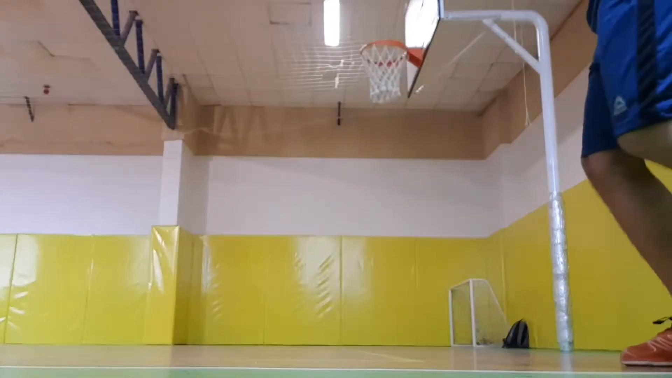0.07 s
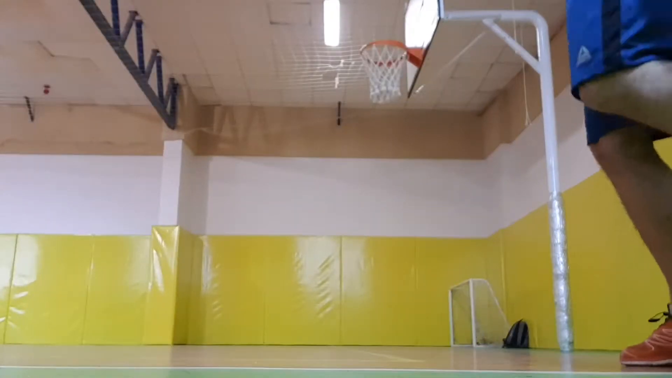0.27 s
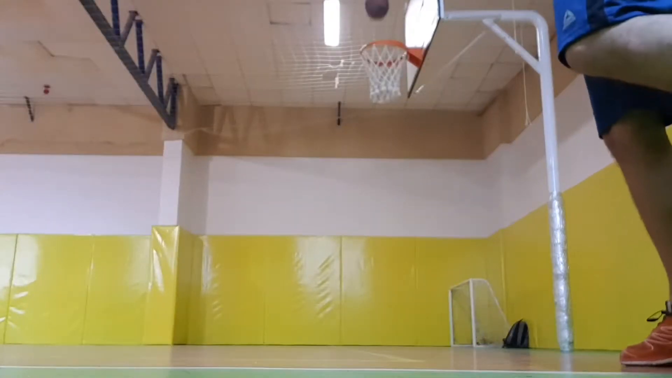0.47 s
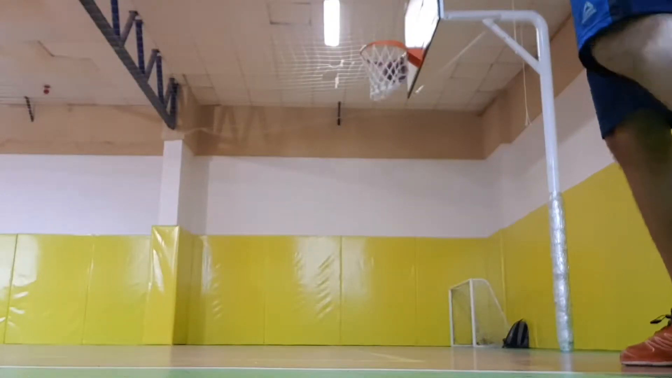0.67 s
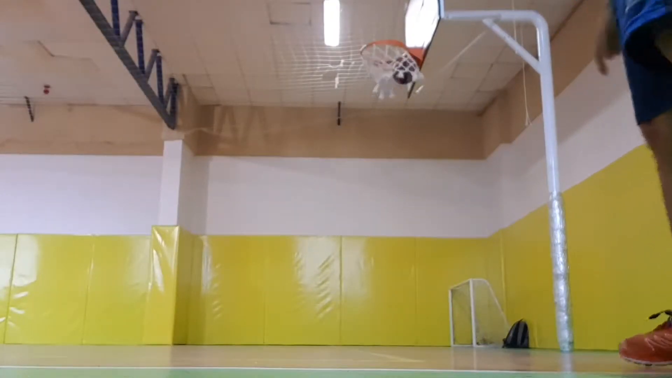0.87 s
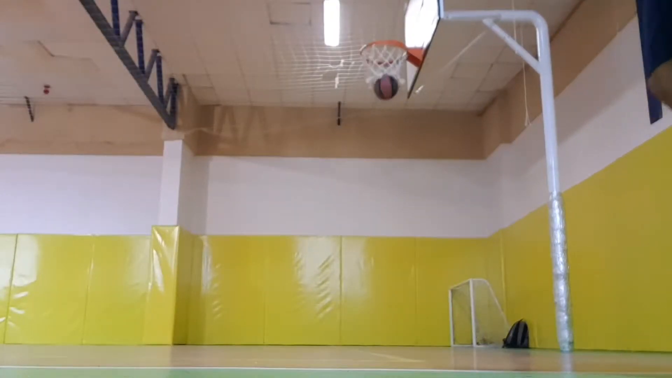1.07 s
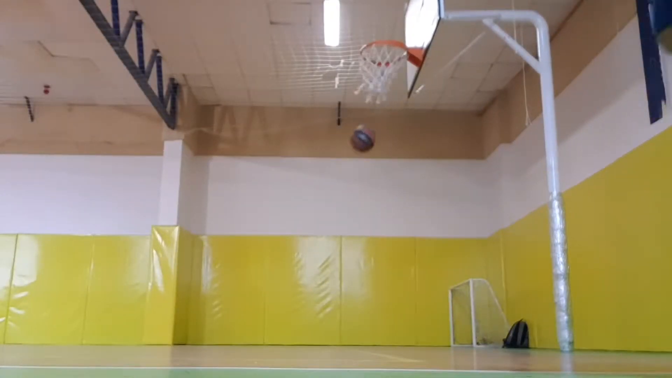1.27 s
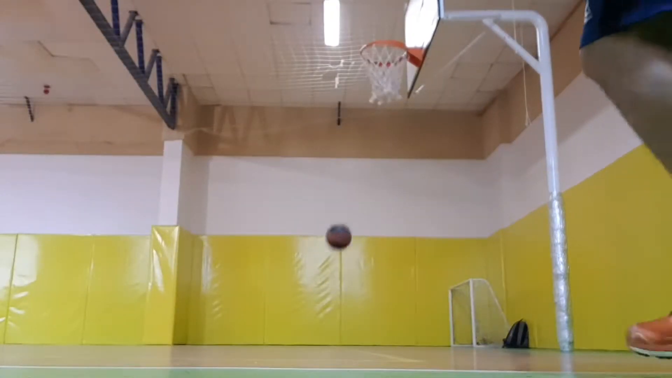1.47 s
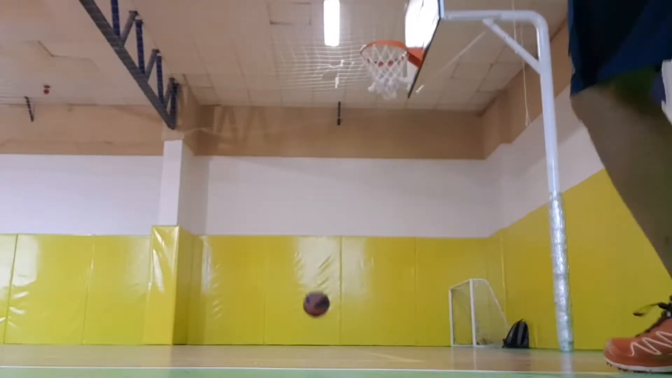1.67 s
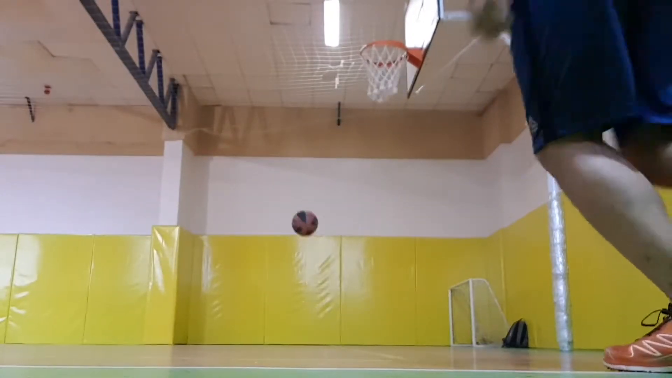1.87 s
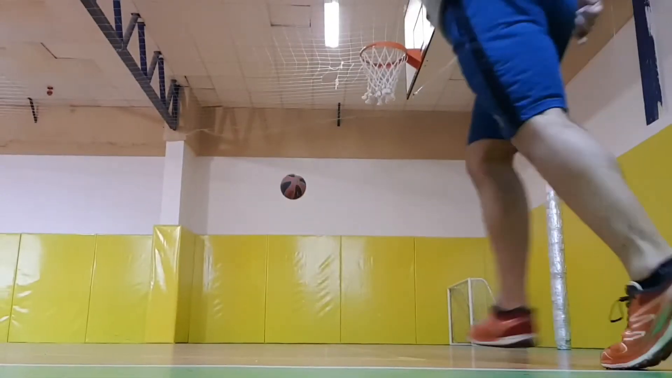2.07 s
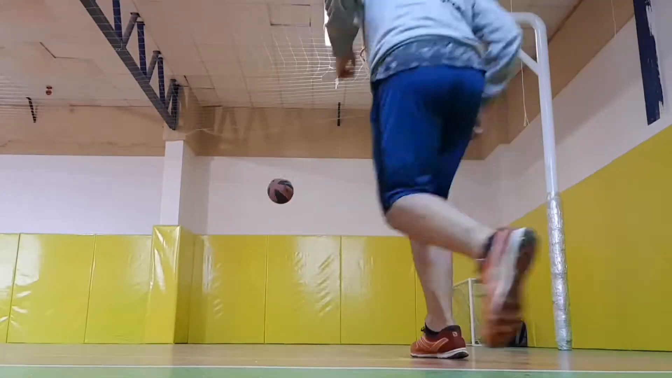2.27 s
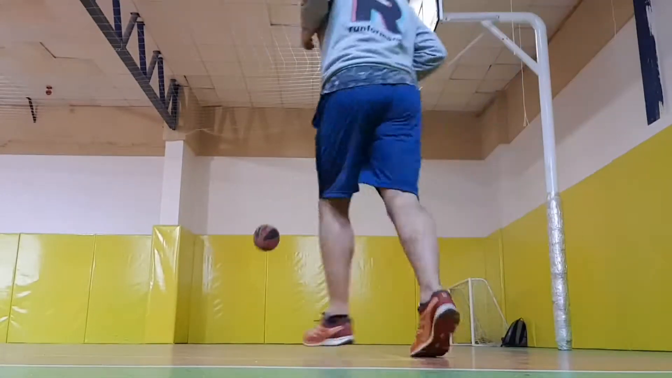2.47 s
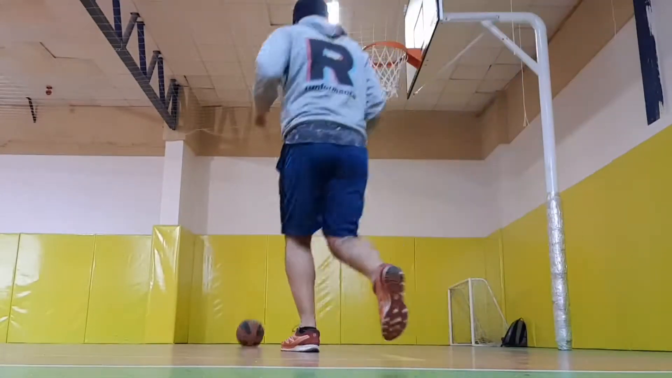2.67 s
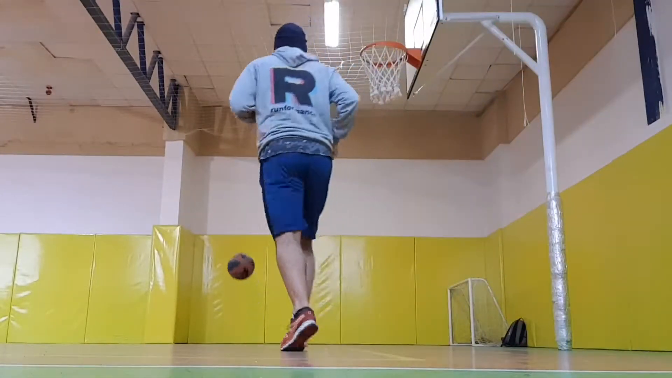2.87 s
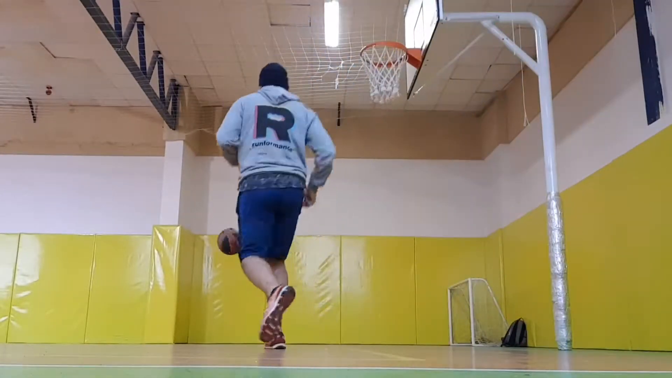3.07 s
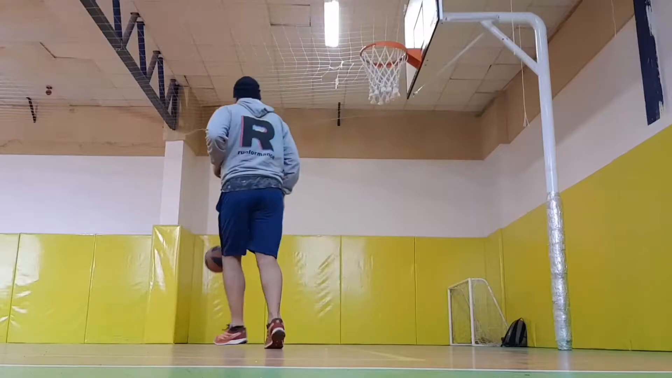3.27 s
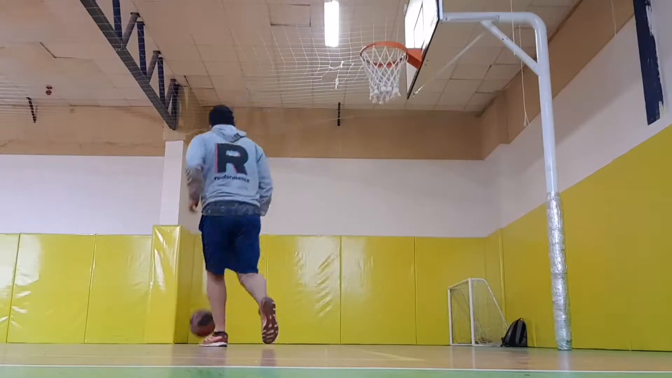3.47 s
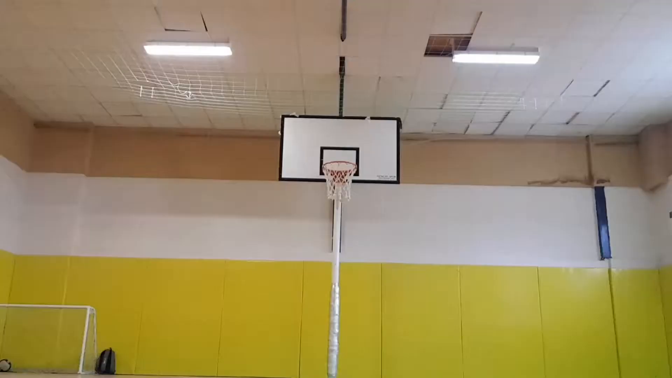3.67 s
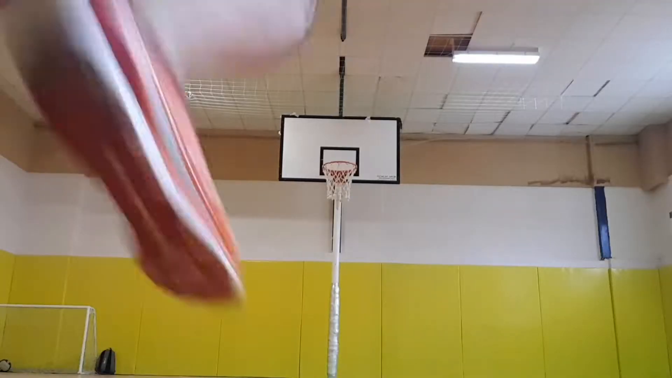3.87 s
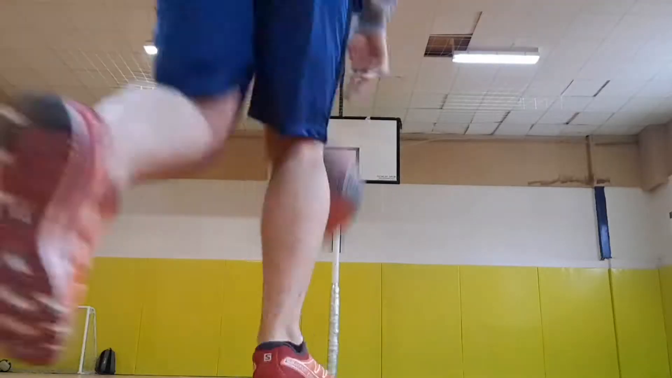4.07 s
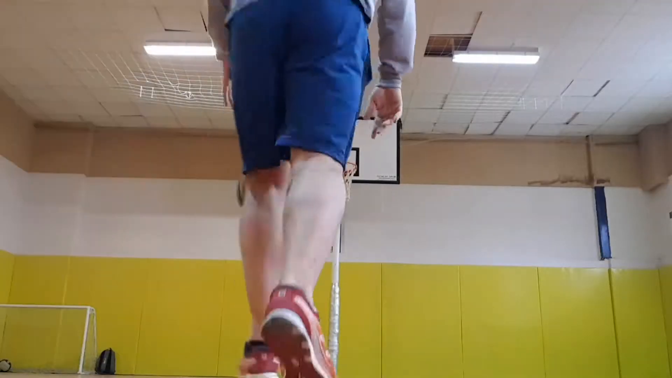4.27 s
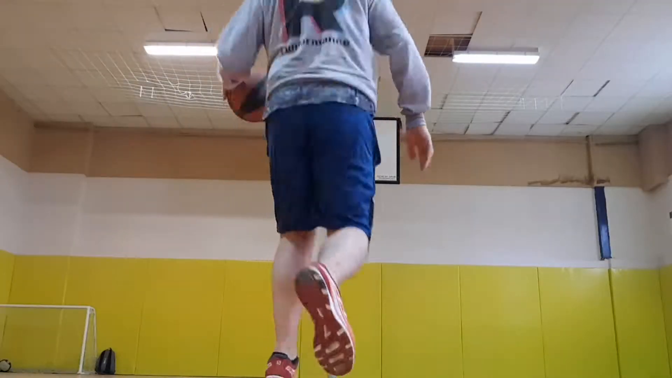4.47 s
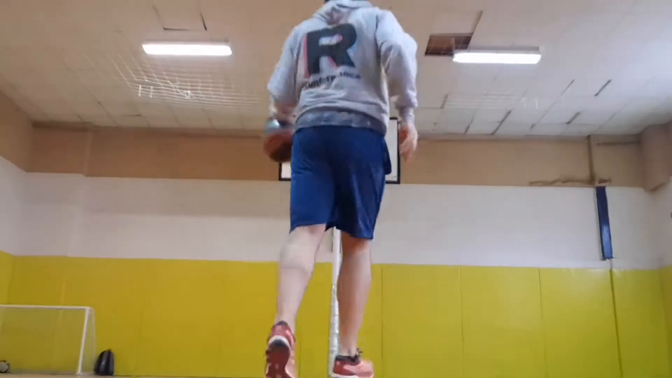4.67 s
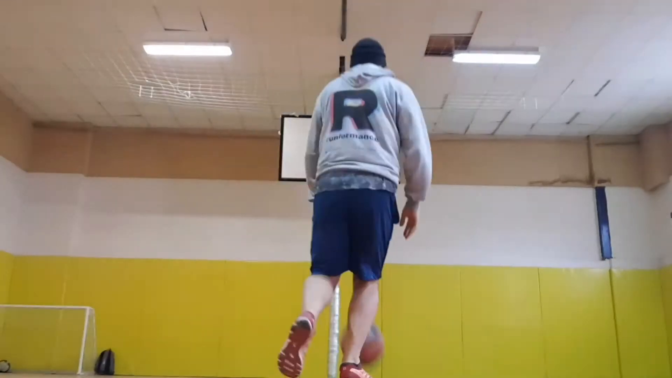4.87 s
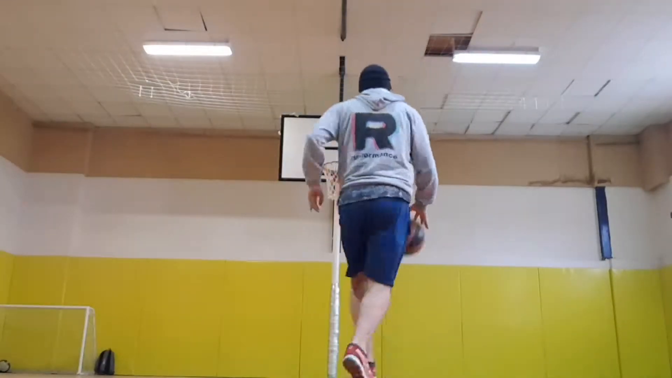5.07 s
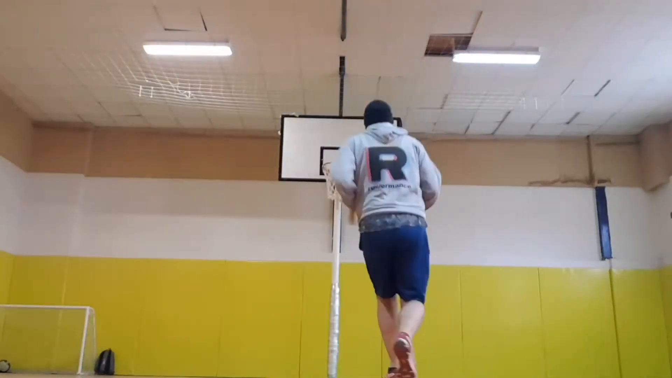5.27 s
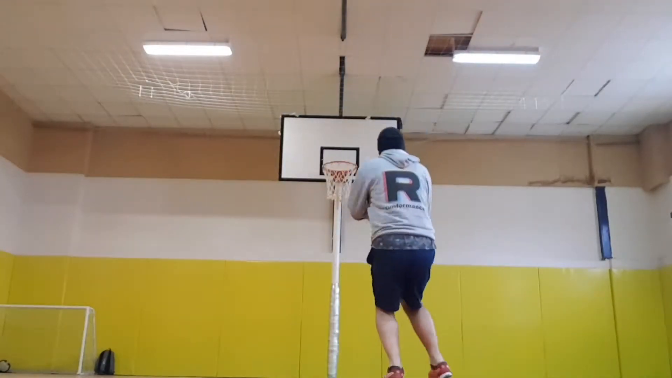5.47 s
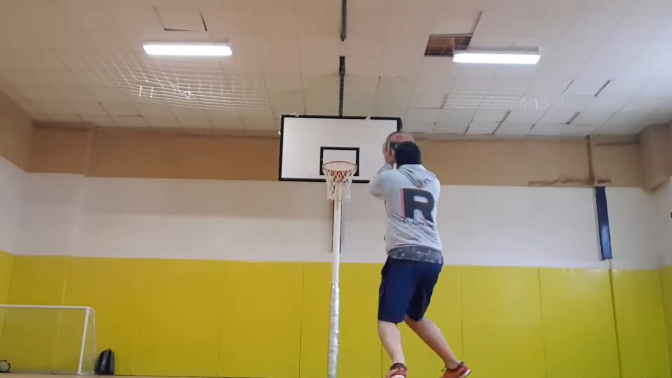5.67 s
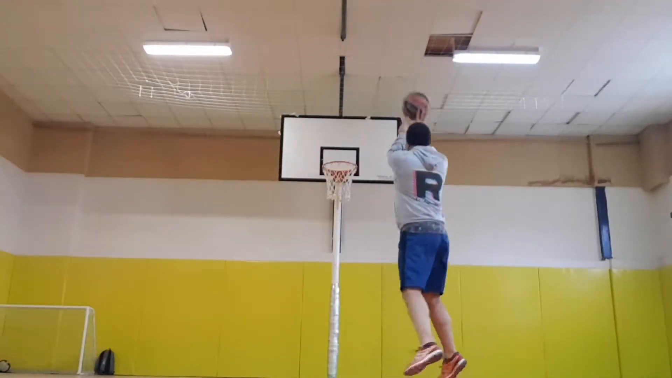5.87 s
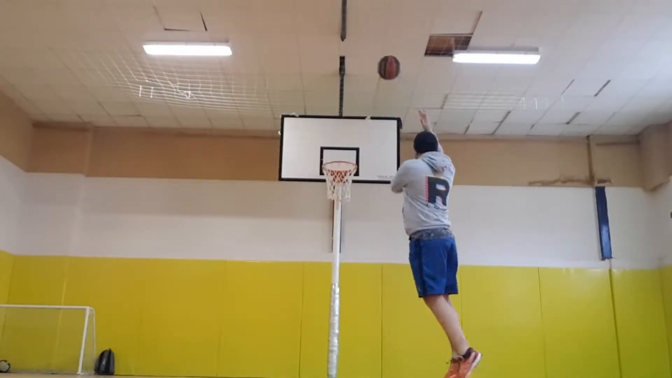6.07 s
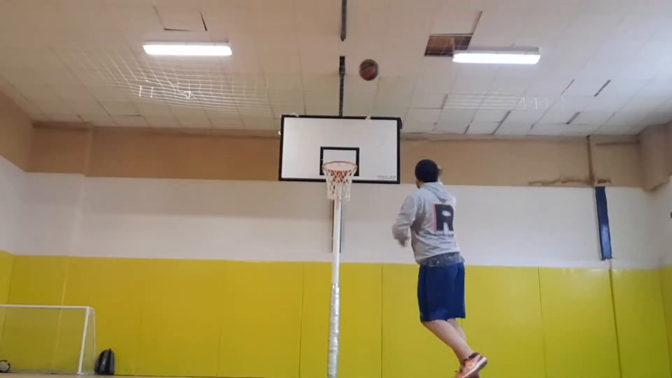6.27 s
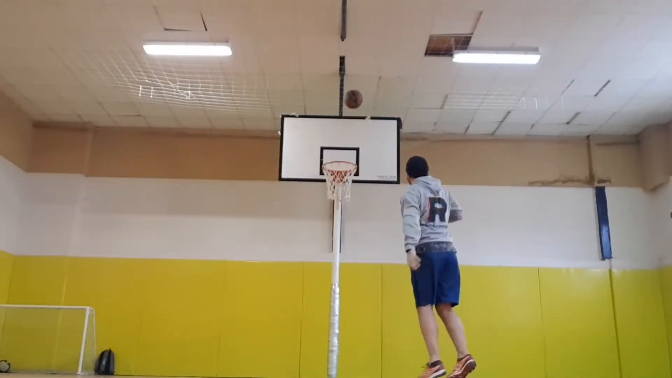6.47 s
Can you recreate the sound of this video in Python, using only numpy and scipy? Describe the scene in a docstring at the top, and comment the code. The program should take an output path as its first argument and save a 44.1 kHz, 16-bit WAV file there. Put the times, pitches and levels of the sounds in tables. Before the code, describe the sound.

A faint low hush fills a large echoing gym. At 0 s a shoe chirps on varnish and lands close by with a gritty double tap and floor thud. Around 0.63-0.8 s a ball rattles rim and board in a quick fluttering clatter with light steel jingle; the frame booms low and lingers. A step falls at 1.3 s with a cloth swish, then at 1.72 s the ball hits the floor with a loud, bright slap, hollow thump and rapid echoes. Running steps at 2.2, 2.7, 3.1 and 3.5 s recede; bounces come at 2.78 and, duller, 3.6 s. Close steps at 3.7 and 4.1 s lead into dribble smacks at 4.26 and 5.02 s, with a step at 4.9. Heavy planting steps and a short scuff come near 5.45 s, a lighter step at 5.7, a fingertip tick at 5.9, and soft landing taps from 6.2 to 6.5 s.

```python
"""A shoe chirps and lands on a wooden floor; then a ball rattles the rim and board in an echoing gym.
The ball bounces, and the player runs after it, dribbles and releases another shot.
Ball, floorboards and board frame are sums of decaying modes; shoes, cloth and rim are shaped noise.
A hall of noise bands, each with its own decay, surrounds them over a steady hush."""
import sys
import numpy as np
from scipy import signal
from scipy.fft import rfft, irfft, next_fast_len
from scipy.io import wavfile

SR = 44100
rng = np.random.default_rng(int(sys.argv[2]) if len(sys.argv) > 2 else 0)


def transcribe(u):
    """Save the signal u as a 16-bit wav file named by the first command-line argument.

    u: samples, shape (n,) or (channels, n), limited to [-1, 1]; the rate is SR.
    q: integer samples, one column per channel.
    """
    v = np.clip(np.atleast_2d(u).T, -1, 1)
    q = np.round(v * 32767).astype(np.int16)
    wavfile.write(sys.argv[1], SR, q)


N = 287532

# All levels are relative; later gains add to them.
# Spectrum of the steady hush. Each row: frequency in Hz, level in dB.
HUSH_SPECTRUM = [(25, -7.5), (45, -4.5), (70, -10), (108, 0.5), (175, -23.5), (285, -40.5), (516, -41.5),
                 (2400, -40), (6700, -41), (15000, -35.5)]
# Likeness of the two sides in diffuse sound. Each row: frequency in Hz, left-right correlation.
LIKENESS = [(60, 1), (130, 0.98), (250, 0.92), (500, 0.63), (1000, 0.077), (3000, 0.041), (12000, 0.16)]
# Decay of the hall's late tail. Each row: frequency in Hz, time to fall 60 dB in seconds.
HALL_DECAY = [(50, 1.17), (130, 0.82), (350, 1.055), (700, 0.7), (1400, 1.31), (2500, 1.494), (4200, 1.27),
              (7000, 0.9), (11000, 0.58), (16000, 0.81)]
# Colour of the hall's response. Each row: frequency in Hz, level in dB.
HALL_COLOUR = [(30, -4.5), (70, 0), (135, 0), (250, 0), (480, -0.5), (750, -5), (1300, -2), (2500, -5.5),
               (4500, -3.5), (8000, 0.5), (15000, 4)]
# The player's distance from the microphone. Each row: time in seconds, distance in m.
PLAYER_DISTANCE = [(0, 1.33), (2.199, 1.9), (2.7, 3.9), (3.551, 4.9), (3.75, 1.24), (4.1, 1), (4.9, 3.34),
                   (5.6, 2.37), (6.3, 4.9)]
# Clothes swishing. Each row: centre in seconds, level in dB, length in seconds.
SWISHES = [(0.006, -46.5, 0.049), (1.37, -52.5, 0.14), (3.937, -62, 0.15), (4.31, -49, 0.0095),
           (5.449, -56.5, 0.05)]
# Spectrum of rubbing cloth. Each row: frequency in Hz, level in dB.
CLOTH_SPECTRUM = [(100, -7.5), (500, 19.5), (1200, -8), (4000, 3), (7000, -8.5), (12000, -7.5),
                  (15500, -22)]
# Soles chirping on varnish. Each row: centre in seconds, level in dB, length in seconds.
SCUFFS = [(0, -49, 0.14), (0.206, -60, 0.011), (2.558, -55.5, 0.013)]
# Spectrum of the chirps. Each row: frequency in Hz, level in dB.
SQUEAK_SPECTRUM = [(240, -40), (1700, -22), (2400, -2.5), (3300, -17), (15000, -44.5)]
# Soles grinding as a stride is braked. Each row: centre in seconds, level in dB, length in seconds.
SLIDES = [(3.111, -46, 0.0095), (5.474, -50, 0.026), (6.282, -57.5, 0.033)]
# Spectrum of the grinding. Each row: frequency in Hz, level in dB.
GRIND_SPECTRUM = [(100, -20), (450, 2), (750, 2), (1200, -3.5), (2400, -4), (4000, -27), (15000, -44)]
# Fingers push the dribble and release the shot. Each row: start in seconds, level in dB.
TOUCHES = [(4.198, -44.5), (5.910, -39.5)]
# Spectrum of the fingertips. Each row: frequency in Hz, level in dB.
FINGER_SPECTRUM = [(250, -36), (1200, -9), (2600, -2), (5000, -24), (15000, -32)]
# A shoe lands heel first, then rolls onto the forefoot. Each row: start in seconds, heel level in dB,
# roll in seconds, forefoot level in dB, treble cut in Hz, floor thud level in dB.
STEPS = [(.009, -14, 0.055, -12, 3000, -3), (1.309, -10, 0.0097, -10, 2450, -9.5),
         (2.234, -19, 0.033, -13, 1650, -7.5), (2.676, -23, 0.024, -19, 2280, -8),
         (3.111, -18.5, 0.018, -22.5, 1800, -13), (3.482, -34.5, 0.041, -18.5, 1200, -1.5),
         (3.705, -10.5, 0.02, -13, 4080, -2), (4.101, -24.5, .022, -19, 3530, 0),
         (4.898, -14, 0.021, -22, 1700, -7), (5.429, -8.5, .023, -14, 1200, 0.5),
         (5.732, -24, 0.021, -31.5, 1500, -6), (6.208, -36, .021, -21.5, 1700, -2),
         (6.262, -24, 0.051, -26, 1920, -6), (6.500, -23, 0.0065, -27, 2400, -20)]
# Spectrum of a sole's tap. Each row: frequency in Hz, level in dB.
SOLE_SPECTRUM = [(60, -14), (200, 9.5), (450, 2), (750, 1.5), (1150, -0.5), (2200, -1), (5000, -15.5),
                 (15000, -25.5)]
# Modes of the floorboards under a shoe. Each row: frequency in Hz, level in dB, 60 dB decay in seconds.
STEP_BOARD_MODES = [(110, -12.5, 0.031), (200, -0.5, 0.028), (324.7, -6.5, 0.059), (414.4, -2, 0.052),
                    (543, -12.5, 0.062), (670, -3.5, 0.018)]
# Ball rattling between rim and board. Each row: start in seconds, clatter level in dB,
# frame level in dB, jingle level in dB.
HOOP_HITS = [(0.63, -35, -29, -29.5), (0.64, -19, -27.5, -25), (.654, -9.5, -12, 3),
             (.680, -4.5, -11, -4.5), (.702, 1, -0.5, -7.5), (0.732, -1, -2, -5.5), (.790, -10, -7, -6)]
# Modes of rim, board and pole. Each row: frequency in Hz, level in dB, 60 dB decay in seconds.
FRAME_MODES = [(39.3, -16.5, 3.9), (60.3, -12, 2.2), (112.4, -4.5, 1.31), (150, -10.5, 1.3),
               (175.4, -6.5, 1.9), (204.3, -4.5, 1.2), (248.4, -4.5, 1.51), (291.5, -5, 1.15),
               (365.3, -9.5, 1.4), (459, -14.5, 1.2), (947, -13, 0.45), (1083, -10, 0.4), (1260, 5, 0.095),
               (1444, -6.5, 0.6), (1660, -6, 0.25), (2310, -22.5, 1.1)]
# Spectrum of the rim's clatter. Each row: frequency in Hz, level in dB.
CLATTER_SPECTRUM = [(60, -19.5), (200, -3.5), (400, 0), (700, 3.5), (1000, 1.5), (1550, -3), (2200, -8.5),
                    (4000, -17), (7000, -31), (10000, -48.5), (15000, -43.5)]
# Spectrum of the rim's loose steel. Each row: frequency in Hz, level in dB.
JINGLE_SPECTRUM = [(500, -17), (2000, -6), (4000, -2.5), (7000, -8.5), (10000, -16.5), (15000, -23)]
# Ball on floor. Each row: start in seconds, slap level in dB, slap cut in Hz, smack level in dB,
# smack frequency in Hz, thump level in dB, thump frequency in Hz, floorboard level in dB,
# hall level in dB, echo level in dB, near wall lag in seconds, ceiling lag in seconds.
BOUNCES = [(1.7208, 1, 5540, -10.5, 1430, -4.5, 128.2, -8.5, 4, -3, .0085, .0340),
           (2.7812, -2, 6600, -17.5, 2100, -11, 122, -29, 3.5, -6, 0.01, 0.033),
           (3.6016, -8.5, 3090, -33, 1490, -16.5, 119, -18.5, 1, -0.5, .0107, .0349),
           (4.2590, -8.5, 3430, -22.5, 3160, -13.5, 127, -8.5, -2, -35, .0230, 0.05),
           (5.0174, -3.5, 3160, -35, 3000, -13.5, 120.6, -13, 6, -13.5, 0.025, 0.052)]
# Modes of skin slapping the boards. Each row: frequency in Hz, level in dB, 60 dB decay in seconds.
SLAP_MODES = [(265, -21.5, 0.046), (970, -23, 0.018), (1240, -17.5, 0.011), (1920, -5.5, 0.0021),
              (2698, -13, 0.0053), (3804, -6.5, 0.0021), (5600, -13.5, 0.00045), (11600, -17.5, .0007)]
# Modes of the air inside the ball. Each row: frequency in Hz, level in dB, 60 dB decay in seconds.
BALL_AIR_MODES = [(961, -35.5, 0.11), (1074, -32.5, 0.13), (1232, -45.5, 0.37), (1277, -45, 0.16),
                  (1358, -37, 0.16), (1488, -39.5, 0.25), (1693, -42.5, .25), (1790, -41.5, 0.25),
                  (2340, -46.5, 0.3), (2720, -40, 0.23), (3580, -34, 0.024)]


def from_db(db):
    """Decibels to amplitude: 20 dB is a factor of ten."""
    return 10 ** (np.asarray(db) / 20)


def seconds(length):
    """Sampling: a time axis of the given length in seconds."""
    return np.arange(int(length * SR)) / SR


def at_hz(points, hz):
    """Interpolation on a log-frequency axis, as pitch is heard."""
    f, value = np.transpose(points)
    return np.interp(np.log(np.maximum(hz, 1)), np.log(f), value)


def add(out, s, sound):
    """Superposition: mix a sound in at time s."""
    i = max(0, round(s * SR))
    room = max(0, out.shape[-1] - i)
    out[..., i:i + sound.shape[-1]] += sound[..., :room]


def soften(x, cut_hz, order=2):
    """Low-pass filtering: a softer contact loses its treble."""
    low_pass = signal.butter(order, min(cut_hz, .45 * SR), fs=SR, output="sos")
    return signal.sosfilt(low_pass, x)


def ring(modes, t, spread_db=0):
    """Modal synthesis: struck modes decay exponentially, their strengths varied at random."""
    chance_db = spread_db * rng.uniform(-1, 1, len(modes))
    total = 0
    for (hz, db, t60), own_db in zip(modes, chance_db):
        total = total + from_db(db + own_db - 60 * t / t60) * np.sin(2 * np.pi * hz * t)
    return total


def spread(mid, side, hz):
    """Interaural correlation: two unrelated signals become stereo, alike on both sides in the bass."""
    alike = np.clip(at_hz(LIKENESS, hz), -1, 1)
    return np.sqrt(1 + alike) * mid + np.sqrt(1 - alike) * side * [[1], [-1]]


def noise(spectrum, size):
    """Random-phase synthesis: diffuse stereo noise of rms 1 with a given spectrum."""
    hz = np.fft.rfftfreq(size, 1 / SR)
    mid, side = np.exp(2j * np.pi * rng.random((2, len(hz))))
    x = irfft(from_db(at_hz(spectrum, hz)) * spread(mid, side, hz), size)
    return x / x.std()


def flutter(t, depth_db, per_s):
    """Random amplitude modulation: a jumping gain with mean power 1."""
    knots = np.arange(0, t[-1] + 1, 1 / per_s)
    jumps = np.clip(rng.standard_normal(len(knots)), -2, 2)
    gain = from_db(depth_db * np.interp(t, knots, jumps))
    return gain / np.sqrt(np.mean(gain ** 2))


def hush(level_db=-64.5):
    """Stationary noise: the hall's steady background."""
    return from_db(level_db) * noise(HUSH_SPECTRUM, next_fast_len(N))[:, :N]


def hall(x, build_s=0.016, scatter_db=-5, scatter_t60=0.08, clump_db=1.0, grain_db=3):
    """Reverberation: quick scatter from near floor and walls, then a tail that dies band by band."""
    t = seconds(2)
    # reflections come in clumps
    arrivals = flutter(t, clump_db, per_s=130) * flutter(t, grain_db, per_s=1300)
    white = rfft(noise([(20, 0), (20000, 0)], len(t)) * arrivals)
    octave = np.log2(np.maximum(np.fft.rfftfreq(len(t), 1 / SR), 1))
    # the scatter's square root keeps its energy independent of its decay time; each band's tail carries energy
    # in proportion to its own
    scatter = from_db(scatter_db - 60 * t / scatter_t60) * np.sqrt(np.log(1e6) / scatter_t60 / SR)
    response = 0
    for centre in np.arange(4.5, 14.6, .5):   # overlapping half-octave steps
        band = irfft(white * np.maximum(0, 1 - 2 * np.abs(octave - centre)), len(t))
        tail = from_db(-60 * t / at_hz(HALL_DECAY, 2 ** centre)) * np.sqrt(np.log(1e6) / SR)
        colour = from_db(at_hz(HALL_COLOUR, 2 ** centre))
        response = response + band * colour * np.hypot(tail, scatter)
    response = response * np.minimum(t / build_s, 1)
    return signal.fftconvolve(x[None], response, axes=1)[:, :N]


def swell(s, length):
    """Gaussian envelope: a smooth stroke centred on s, with length as its standard deviation."""
    return np.exp(-.5 * np.minimum(((np.arange(N) / SR - s) / length) ** 2, 100))


def rub(spectrum, strokes):
    """Friction noise: rubber or fabric swells and fades with each stroke."""
    strength = sum(from_db(db) * swell(s, length) for s, db, length in strokes)
    return noise(spectrum, next_fast_len(N))[:, :N] * strength


def hands(t60=0.0086):
    """Impact noise: fingertips tick on the ball."""
    out, t = np.zeros((2, N)), seconds(.1)
    for s, db in TOUCHES:
        add(out, s, noise(FINGER_SPECTRUM, len(t)) * from_db(db - 60 * t / t60))
    return out


def steps(level_db=-21, tap_t60=0.048, grit_db=4.0):
    """Impact and resonance: heel and forefoot give gritty taps over a thud of the sprung floor."""
    out, t = np.zeros((2, N)), seconds(.2)
    for s, heel_db, roll_s, fore_db, cut_hz, thud_db in STEPS:
        for lag, db in ((0, heel_db), (roll_s, fore_db)):
            grit = flutter(t, grit_db, per_s=700)
            tap = noise(SOLE_SPECTRUM, len(t)) * grit * from_db(-60 * t / tap_t60)
            thud = from_db(thud_db) * ring(STEP_BOARD_MODES, t, spread_db=0.5)
            add(out, s + lag, from_db(level_db + db) * (soften(tap, cut_hz, order=1) + thud))
    return out


def player(rub_hall_db=-4, hand_hall_db=-8, hall_radius_m=2.26):
    """Direct-to-reverberant ratio: the hall's share of shoes, hands and clothes grows with distance."""
    metres = np.interp(np.arange(N) / SR, *np.transpose(PLAYER_DISTANCE))
    taps, ticks = steps(), hands()
    rubs = rub(SQUEAK_SPECTRUM, SCUFFS) + rub(GRIND_SPECTRUM, SLIDES) + rub(CLOTH_SPECTRUM, SWISHES)
    to_hall = taps + from_db(hand_hall_db) * ticks + from_db(rub_hall_db) * rubs
    return taps + ticks + rubs, to_hall[0] * metres / hall_radius_m


def frame(level_db=-24.5, blur_hz=22, blur_share=.03):
    """Energy storage in modes: board and pole boom on, each mode blurred by many paths in the hall."""
    t, start = seconds(2.2), HOOP_HITS[0][0]
    blows, out, boom = np.zeros(len(t)), np.zeros((2, N)), 0
    push = np.hanning(int(.012 * SR))   # the soft ball feeds its energy in gradually
    for s, _, db, _ in HOOP_HITS:
        add(blows, s - start, from_db(db) ** 2 * push / push.sum())
    for hz, db, t60 in FRAME_MODES:
        # energy leaks away at the mode's own rate
        energy = signal.lfilter([1], [1, -from_db(-120 / (t60 * SR))], blows)
        # random phases, joined by straight lines, wander faster for higher modes
        paths = np.exp(2j * np.pi * rng.random((2, 2048)))
        position = t * (blur_hz + blur_share * hz)
        mid, side = (np.interp(position, np.arange(len(p)), p) for p in paths)
        wave = np.real(spread(mid, side, hz) * np.exp(2j * np.pi * hz * t))
        boom = boom + from_db(level_db + db) * np.sqrt(energy) * wave
    add(out, start, boom)
    return out


def rim(clatter_db=-18, clatter_t60=0.26, rise_s=0.0045, rattle_db=4,
        jingle_db=-38, jingle_t60=0.21, jingle_grain_db=6, direct_db=-2, hall_db=-1):
    """Rattling contact: the loose rim gives fluttering bursts of clatter and jingle at each touch."""
    out, t = np.zeros((2, N)), seconds(0.94)
    for s, hit_db, _, steel_db in HOOP_HITS:
        rattle = np.minimum(t / rise_s, 1) * flutter(t, rattle_db, per_s=260)
        clatter_fall = from_db(clatter_db + hit_db - 60 * t / clatter_t60)
        add(out, s, clatter_fall * rattle * noise(CLATTER_SPECTRUM, len(t)))
        grain = flutter(t, jingle_grain_db, per_s=340)
        jingle_fall = from_db(jingle_db + steel_db - 60 * t / jingle_t60)
        add(out, s, jingle_fall * grain * noise(JINGLE_SPECTRUM, len(t)))
    return from_db(direct_db) * out, from_db(hall_db) * out[0]


def thump(t, hz, t60=0.083, contact_s=0.01225, lift_db=0, lift_width_s=0.0017,
          floor_hz=72, floor_db=-13, floor_t60=0.11):
    """Mass on a spring: the ball squashes, pulses as it lifts off, and sets the sprung floor booming."""
    u = np.abs(t - contact_s) / lift_width_s
    lift_off = from_db(lift_db) * (1 - u / 2) * np.exp(-np.minimum(u, 50))
    return ring([(hz, 0, t60), (floor_hz, floor_db, floor_t60)], t) + lift_off


def echoes(sound, wall_s, ceiling_s, wall_cut_hz=12000, rebound_db=-8, skew_s=0.00017, count=4,
           ceiling_db=-6, trip_loss_db=4, trip_cut_hz=13000):
    """Specular reflection: a near-wall echo and ceiling-floor trips, weaker and duller each time."""
    out = np.zeros_like(sound)
    arrivals = [(wall_s, soften(sound, wall_cut_hz))]
    for trip in range(count):
        sound = soften(sound, trip_cut_hz, order=1)
        lag = (trip + 1) * ceiling_s
        back = from_db(ceiling_db - trip_loss_db * trip) * sound
        # each trip rebounds off the near wall too
        arrivals += [(lag, back), (lag + wall_s, from_db(rebound_db) * back)]
    for lag, back in arrivals:
        skew = skew_s * rng.uniform(-1, 1)   # echoes come in from the side
        add(out[0], lag + skew, back[0])
        add(out[1], lag - skew, back[1])
    return out


def bounces(board_hz=376, board_t60=0.0062, smack_t60=0.0056, second_s=.00056, second_db=-7,
            crackle_db=-21, crackle_t60=0.017):
    """Impact of an elastic shell: slap, ping of the air inside, board knock and thump, with echoes."""
    direct, to_hall, t = np.zeros((2, N)), np.zeros(N), seconds(.7)
    for (s, slap_db, cut_hz, smack_db, smack_hz, thump_db, thump_hz, board_db,
         hall_db, echo_db, wall_s, ceiling_s) in BOUNCES:
        skin = -ring(SLAP_MODES, t)
        ping = ring(BALL_AIR_MODES, t, spread_db=3)
        slap = from_db(slap_db) * soften(skin + ping, cut_hz, order=1)
        smack = ring([(smack_hz, smack_db, smack_t60)], t)   # air squeezed out from under the ball
        knock = ring([(board_hz, board_db, board_t60)], t)
        body = slap + from_db(thump_db) * thump(t, thump_hz) - knock - smack
        # the pebbled skin crackles as it flattens and snaps once more as it buckles
        crackle = rng.standard_normal((2, len(t))) * from_db(crackle_db - 60 * t / crackle_t60)
        add(crackle, second_s, from_db(second_db) * skin)
        sound = body + from_db(slap_db) * soften(crackle, cut_hz, order=1)
        add(direct, s, sound + from_db(echo_db) * echoes(sound, wall_s, ceiling_s))
        add(to_hall, s, from_db(hall_db) * body)
    return direct, to_hall


def scene():
    """Superposition: player, rim and ball share one hall, with the booming frame and the hush added."""
    player_direct, player_hall = player()
    rim_direct, rim_hall = rim()
    ball_direct, ball_hall = bounces()
    direct = player_direct + rim_direct + ball_direct
    return hush() + hall(player_hall + rim_hall + ball_hall) + frame() + direct


def record(dry, low_cut_hz=37, ceiling=.92, top_cut_hz=15800):
    """Band limiting and clipping: deep bass is shed, peaks are clipped, then the top is cut."""
    high_pass = signal.butter(3, low_cut_hz, "high", fs=SR, output="sos")
    low_pass = signal.ellip(10, .2, 80, top_cut_hz, fs=SR, output="sos")
    clipped = np.clip(signal.sosfilt(high_pass, dry), -ceiling, ceiling)
    return signal.sosfilt(low_pass, clipped)


dry = scene()
out = record(dry)
transcribe(out)
```